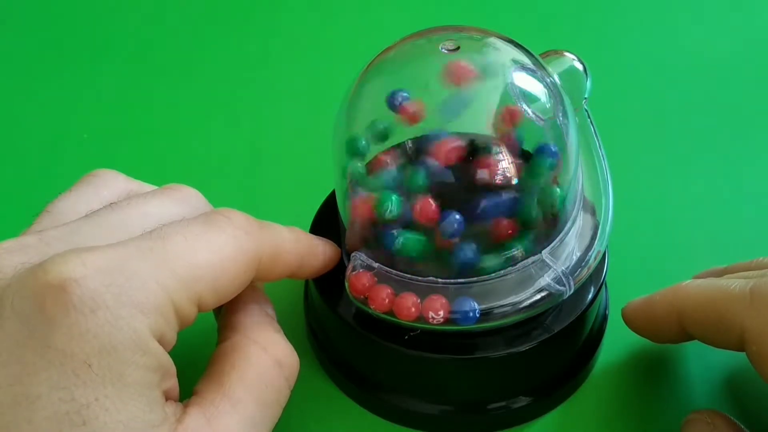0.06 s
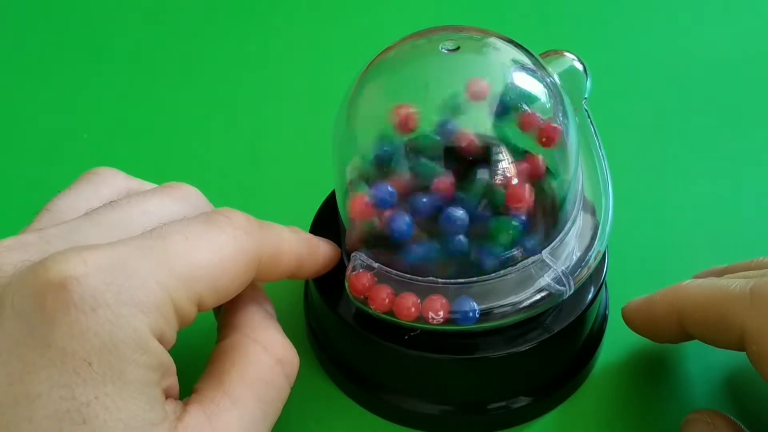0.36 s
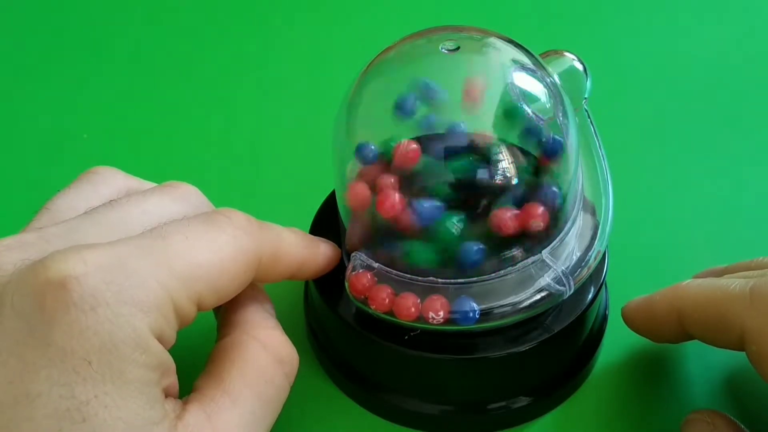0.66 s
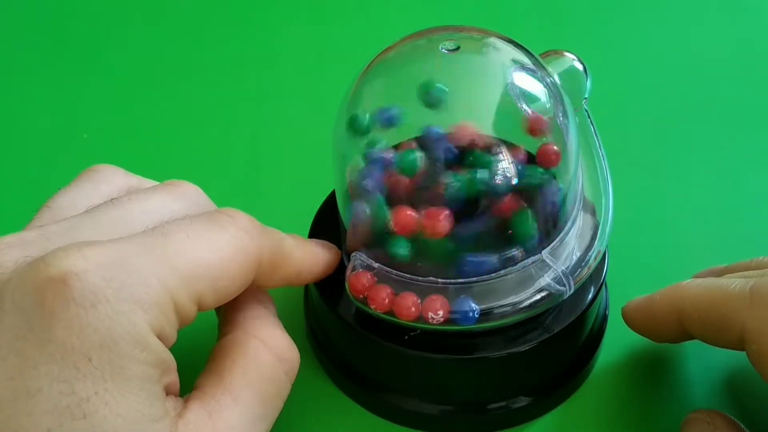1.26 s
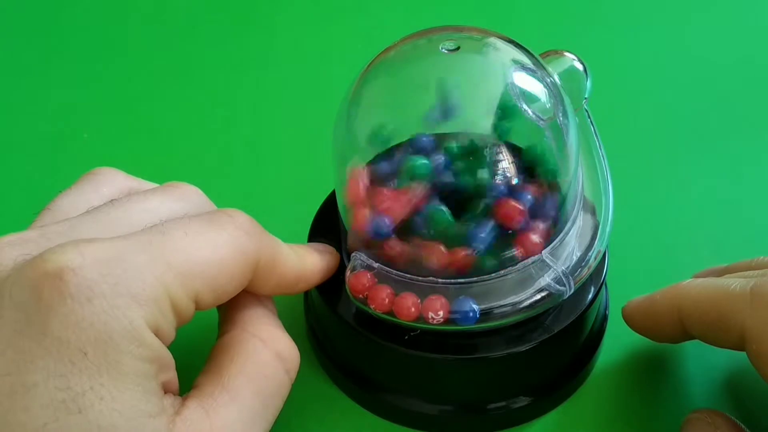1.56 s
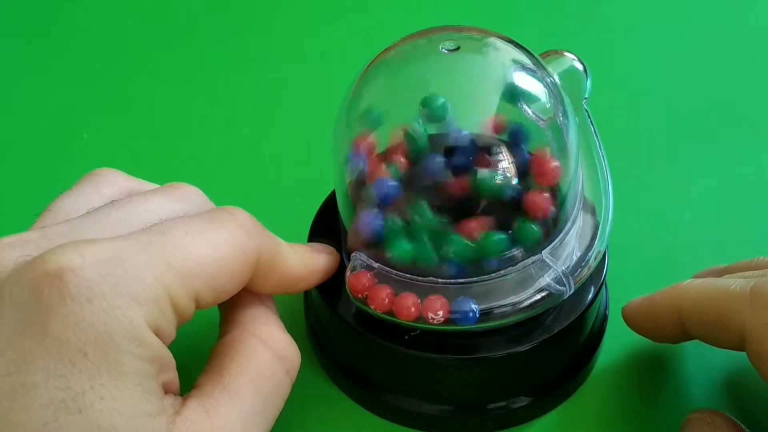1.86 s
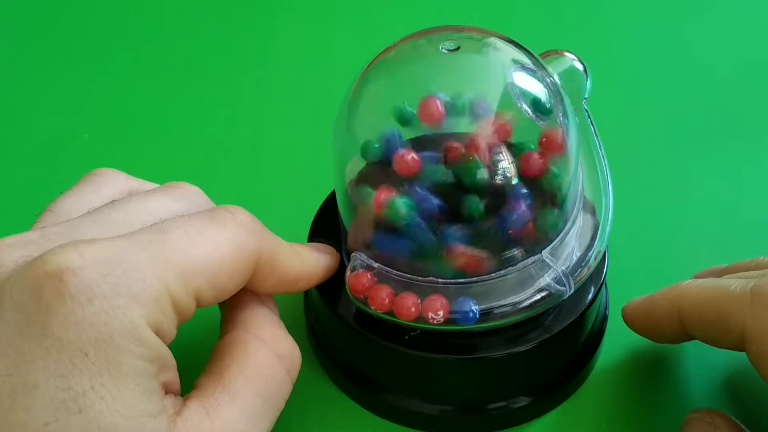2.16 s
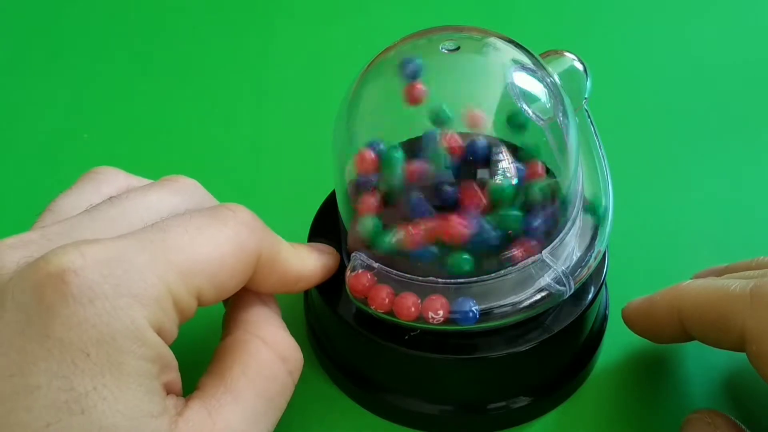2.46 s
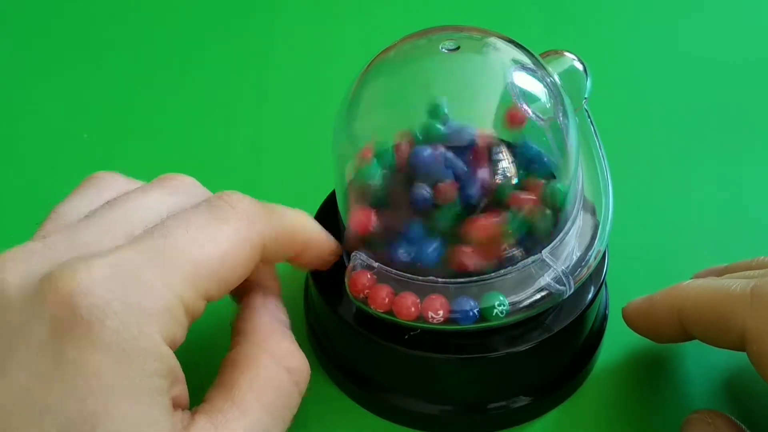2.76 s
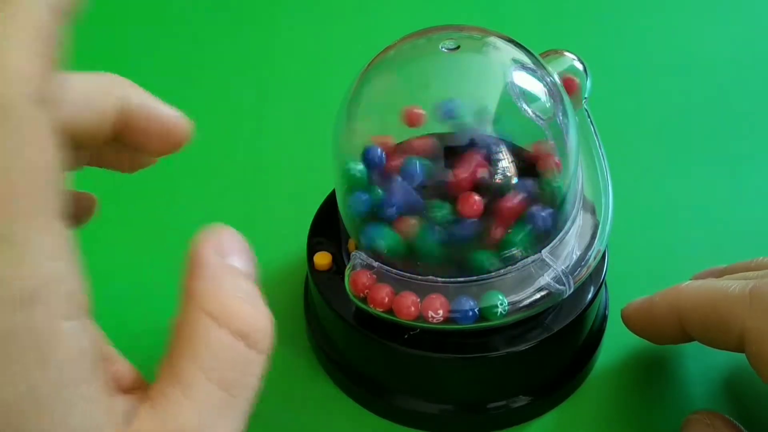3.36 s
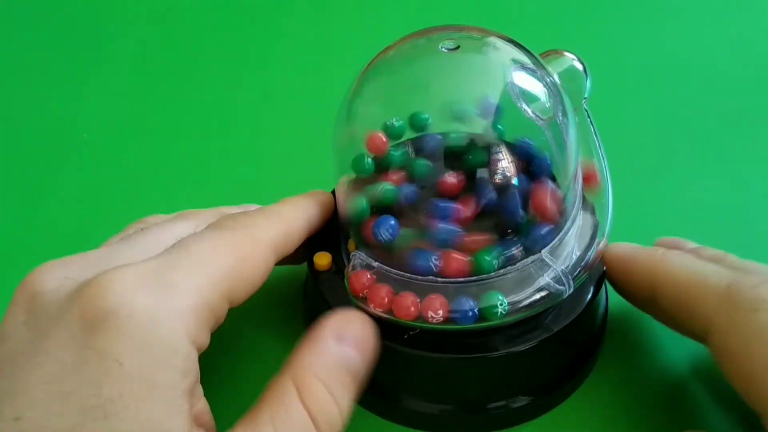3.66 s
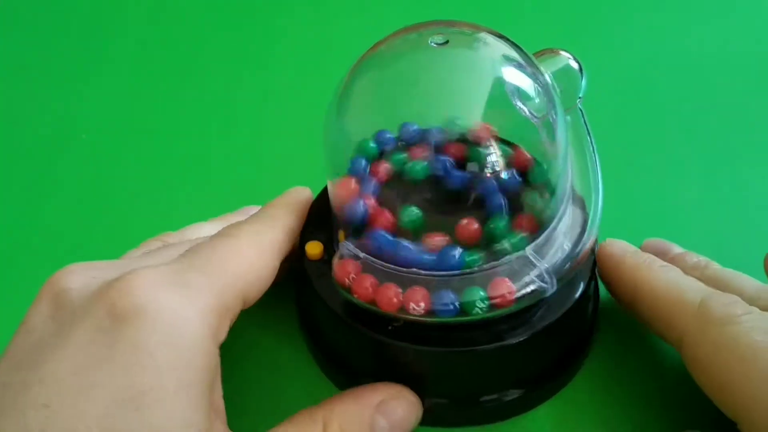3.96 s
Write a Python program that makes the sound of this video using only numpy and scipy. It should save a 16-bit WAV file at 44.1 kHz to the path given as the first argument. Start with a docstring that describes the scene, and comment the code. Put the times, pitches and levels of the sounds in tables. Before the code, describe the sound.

Small plastic balls rattle densely inside a toy lottery machine over a low motor hum.

```python
"""A small room, close to a toy lottery machine: small plastic balls churn in its clear dome.
A motor-driven plate flings them up. They click against each other and the dome in dense flurries,
ring the dome wall and drum on the plate and the hollow base. The motor hums underneath.
One brief low puff of air touches the microphone; near the end a fingertip taps the casing."""
import sys
import numpy as np
from scipy import signal
from scipy.fft import rfft, irfft, next_fast_len
from scipy.io import wavfile
from scipy.ndimage import uniform_filter1d, map_coordinates

SR = 44100
rng = np.random.default_rng(int(sys.argv[2]) if len(sys.argv) > 2 else 0)


def pcm_store(signal):
    """Save signal as 16-bit PCM."""
    levels = np.round(np.clip(np.atleast_2d(signal), -1, 1) * 32767)
    wavfile.write(sys.argv[1], SR, levels.astype(np.int16).T)


N = 176400
DOME_RISE_S = 0.00083


# Each row: time in seconds, clatter level in dB.
CLATTER_LEVELS = [(0.0, -19.5), (0.03, -17.5), (0.08, -18), (0.44, -19), (0.5, -22), (0.52, -17.5),
                  (0.95, -24), (1.01, -20), (1.02, -17), (1.05, -20), (1.3, -18), (1.31, -22), (1.36, -17),
                  (1.37, -19), (1.99, -18.5), (2.07, -18.5), (2.13, -16), (2.17, -19), (2.18, -26.5),
                  (2.19, -19), (2.29, -18.5), (3.63, -19), (3.69, -22.5), (3.71, -16), (3.77, -22),
                  (3.82, -16.5), (4.0, -22)]
# Each row: start in seconds, relative level of a hard hit in dB.
HARD_HITS = [(.1226, -3), (.2508, 0), (.3227, 1), (.609, -5.5), (.6449, -5), (.6898, 1.5), (.8041, 2),
             (.841, 0), (.9245, 1), (1.0191, -3), (1.1084, 1), (1.3008, -5.5), (1.3328, -5), (1.398, -5),
             (1.485, 0.5), (1.5405, -2), (1.8213, 1), (2.0582, -9), (2.3351, -4), (2.408, 0), (2.5203, -1),
             (2.588, -5), (2.6334, -2), (2.8499, -8), (2.8933, 3.5), (2.9584, -1.5), (3.042, -4),
             (3.2226, -1)]
# Each row: frequency in Hz, gain of a click in dB.
CLICK_SPECTRUM = [(200, -39.5), (600, -15), (1100, -20.5), (1500, -21.5), (1750, -17.5), (2000, -14.5),
                  (2300, -14.5), (2850, -9), (3450, -11), (3900, -7), (4250, -7), (4850, -3.5),
                  (5200, -5.5), (5850, -2), (6300, -4.5), (7300, -3), (8200, -2.5), (8700, -0.3),
                  (9200, -3), (10200, -4), (12000, -8), (14500, -10), (15700, -10.5)]
def clatter(flurry_db, rebound_s=0.0012, rebound_db=-1.5):
    """Balls click against each other and the dome; a few hit hard and chatter."""
    level_db, = curves(CLATTER_LEVELS)
    clicks = collisions(impacts(per_s=1100, scatter_db=1.5))
    clicks = steady(coloured(clicks, CLICK_SPECTRUM), span_s=0.02)
    hard = np.zeros((2, N + SR))
    for start_s, db in HARD_HITS:
        for k, click in enumerate(contacts(count=4)):
            at = round((start_s + k * rebound_s) * SR)
            hard[:, at:at + click.shape[1]] += amp(db + 11.5 + k * rebound_db) * click
    churn = (clicks * amp(flurry_db) + amp(-15.5) * ticks()) * amp(level_db + 1.85)
    return spread(churn + coloured(hard[:, :N], CLICK_SPECTRUM))


def collisions(blows, spots=8, block=882):
    """Each blow lands on one of a few spots, which keep changing as the heap turns."""
    out = np.zeros((2, N + SR))
    spot = rng.integers(spots, size=N)
    starts = range(0, N, block)
    for at, clicks in zip(starts, np.split(contacts(spots * len(starts)), len(starts))):
        spot_blows = blows[at:at + block] * (spot[at:at + block] == np.arange(spots)[:, None])
        part = signal.fftconvolve(spot_blows[:, None], clicks, axes=2).sum(axis=0)
        out[:, at:at + part.shape[1]] += part
    return out[:, :N]


def contacts(count, size=1024, tint_knots=24):
    """Clicks of energy 1: a crack, the dome's short ring and the ball's own ping."""
    t = np.arange(size) / SR
    crack = unit(decay(t, t60_s=0.00044))
    dome = unit((1 - np.exp(-t / DOME_RISE_S)) * decay(t, t60_s=0.008))
    clicks = rng.standard_normal((count, 2, size)) * np.hypot(crack, dome)
    ping_hz = 8150 * 2 ** (0.323 * np.clip(rng.standard_normal((count, 1, 1)), -2.5, 1.7))
    ping = np.sin(2 * np.pi * (ping_hz * t + rng.random((count, 2, 1))))
    clicks += amp(-8.5) * unit(ping * decay(t, t60_s=0.0054))
    tint_db = 2.5 * signal.resample(rng.standard_normal((count, 1, tint_knots)), size // 2 + 1, axis=2)
    clicks = irfft(rfft(np.roll(clicks, tint_knots, axis=2)) * amp(tint_db))
    return clicks / np.linalg.norm(clicks, axis=2, keepdims=True)


def ticks(size=128):
    """Ball meets ball in mid-air: a bare, very short crack, panned at random."""
    out, t = np.zeros((2, N + size)), np.arange(size) / SR
    blows = impacts(per_s=45, scatter_db=1.3)
    for at in np.flatnonzero(blows):
        crack = rng.standard_normal((2, size)) * decay(t, t60_s=0.0007)
        pan_db = rng.normal(0, 1.4) * np.array([[1], [-1]])
        out[:, at:at + size] += blows[at] * unit(crack * amp(pan_db))
    return unit(coloured(out[:, :N], CLICK_SPECTRUM))


# Each row: time in seconds, clack level in dB.
CLACK_LEVELS = [(0.0, -34), (0.19, -43), (0.24, -20), (0.27, -37), (0.29, -29.5), (0.41, -41), (0.56, -30),
                (0.59, -37), (0.68, -25.5), (0.75, -41), (0.77, -28.5), (0.98, -32), (2.36, -30.5),
                (2.37, -24), (2.42, -38), (2.45, -27), (2.54, -39.5), (2.81, -28.5), (2.84, -55),
                (2.85, -27), (2.92, -32.5), (3.88, -28.5), (3.94, -24.5), (4.0, -29.5)]
# Each row: dome wall resonance in Hz, width in Hz, gain in dB.
WALL_MODES = [(1996, 120, -4), (2297, 110, -9.5), (2770, 177, -1.5), (2965, 65, -2), (3163, 106, -1),
              (3713, 50, 5), (3846, 95, 1)]
def clacks(flurry_db):
    """Balls thrown against the dome wall ring it briefly, duller than the clicks."""
    level_db, = curves(CLACK_LEVELS)
    blows = np.array([impacts(per_s=260, scatter_db=0.5) for _ in range(2)])
    wall = resonate(spread(blows * amp(flurry_db)), WALL_MODES)
    return steady(wall, span_s=0.12) * amp(level_db)


# Each row: start in seconds, relative level in dB, pitch in Hz.
GLANCES = [(0.5192, -17, 3300), (0.7607, -19.5, 2860), (0.8824, -15, 3070), (1.1423, -19, 3730),
           (1.7724, -20, 2750), (2.8449, -20, 3210), (2.9672, -22, 3080), (3.1567, -25, 2780)]
def glancing_blows(size=4096):
    """Each glancing blow rings one pitch of the dome wall."""
    out, t = np.zeros(N + size), np.arange(size) / SR
    envelope = (1 - np.exp(-t / DOME_RISE_S)) * decay(t, t60_s=0.034)
    for start_s, db, hz in GLANCES:
        out[round(start_s * SR):][:size] += amp(db - 2) * envelope * np.sin(2 * np.pi * hz * t)
    return out[:N]


# Each row: time in seconds, base level in dB, plate level in dB.
DRUM_LEVELS = [(0.0, -33, -49), (0.03, -32.5, -31.5), (0.05, -34.5, -38.5), (0.21, -36, -38),
               (0.22, -32.5, -34.5), (0.39, -35, -37.5), (0.43, -35, -50), (0.47, -28, -35),
               (0.5, -41, -49), (0.52, -30.5, -29), (0.58, -39, -47), (0.59, -36, -36.5),
               (0.68, -33.5, -35.5), (0.73, -35, -41), (0.76, -33, -35.5), (0.93, -37, -41.5),
               (0.96, -29, -28.5), (1.0, -35, -36), (1.29, -30.5, -34.5), (1.31, -35, -42),
               (1.37, -31, -33), (1.5, -38, -37), (1.59, -29, -29), (1.61, -32.5, -34), (1.74, -30.5, -33),
               (1.9, -33.5, -38.5), (2.12, -32, -32), (2.16, -31.5, -41), (2.18, -40, -53),
               (2.21, -32, -31), (2.25, -41, -49), (2.28, -28, -26), (2.32, -39.5, -43), (2.37, -29, -32),
               (2.58, -36.5, -40), (2.63, -29.5, -34), (2.7, -37.5, -39), (2.8, -32.5, -34),
               (2.83, -40, -44), (2.9, -31, -29.5), (2.92, -45, -48), (2.97, -45, -38), (3.03, -33, -40),
               (3.06, -41.5, -51), (3.12, -36, -33.5), (3.15, -52, -60), (3.22, -32.5, -34),
               (3.33, -53, -56), (3.36, -36.5, -36.5), (3.42, -50, -62), (3.45, -35.5, -34),
               (3.52, -52, -50), (3.55, -44, -36), (3.57, -37.5, -49), (3.6, -32, -31), (3.64, -48, -59),
               (3.66, -40, -33.5), (3.74, -45, -50), (3.8, -32, -30.5), (3.83, -49, -45),
               (3.84, -39.5, -38.5), (4.0, -44, -46)]
# Each row: time in seconds, relative level of the housing's rumble in dB.
RUMBLE_LEVELS = [(0.0, -39), (0.2, -46), (0.23, -36), (0.41, -44), (0.5, -41.5), (1.18, -40.5), (1.25, -38),
                 (1.48, -42), (1.58, -32), (1.63, -41), (1.72, -37.5), (2.45, -39), (2.96, -49.5),
                 (4.0, -52)]
# Each row: resonance in Hz, width in Hz, gain in dB.
BASE_MODES = [(119, 75, -13), (191.4, 29, -7.5), (281.3, 20.8, 3.5), (360, 48, -5.5), (443.5, 39, -5)]
PLATE_MODES = [(850.6, 80.5, -0.5), (935.5, 60, -1.5), (1027, 32, -4), (1222, 184, -14.5)]
# Each row: frequency in Hz, gain through the housing in dB.
HOUSING_SPECTRUM = [(60, -11.5), (95, -1.5), (118, 1.5), (140, -3.5), (160, -1.5), (195, 6), (225, -0.5),
                    (270, -18.5), (900, -62)]
def drumming(flurry_db, low_cut_hz=46):
    """Balls land on the spinning plate, which rings and shakes the hollow base and the housing."""
    base_db, plate_db = curves(DRUM_LEVELS)
    rumble_db, = curves(RUMBLE_LEVELS)
    knocks = np.array([impacts(per_s=380, scatter_db=3.5) for _ in range(2)])
    knocks = spread(knocks * amp(0.99 * flurry_db))
    # The small base radiates little deep bass.
    knocks = filtered(knocks, lambda hz: hz ** 2 / (hz ** 2 + low_cut_hz ** 2))
    base = coloured(resonate(knocks, BASE_MODES), [(40, -6), (110, 1.5), (470, 6), (560, -7), (1500, -13)])
    base = steady(base, span_s=0.058)
    plate = steady(resonate(knocks, PLATE_MODES), span_s=0.094)
    housing = steady(coloured(knocks, HOUSING_SPECTRUM), span_s=0.12)
    return base * amp(base_db - 1) + plate * amp(plate_db) + housing * amp(rumble_db - 5)


# Each row: start in seconds, peak in dB.
BASE_THUMPS = [(0.016, -22), (.228, -20), (1.565, -32), (2.071, -21), (2.27, -27), (2.609, -23.5)]
def thumps():
    """The plate catches a ball squarely and the base booms."""
    return struck(BASE_MODES, BASE_THUMPS)


# Each row: casing resonance in Hz, width in Hz, gain in dB.
CASING_MODES = [(1210, 150, 1), (1390, 160, 2), (520, 90, -6)]
def finger_tap(start_s=3.878, peak_db=-24):
    """A fingertip lands on the casing and rings it."""
    return struck(CASING_MODES, [(start_s, peak_db)])


# Each row: frequency in Hz, nominal rms level in dB.
MOTOR_LINES = [(118, -49.5), (281, -49.5), (851, -53.5), (1200, -57)]
def motor():
    """The hum wavers in speed and strength; the load of the balls follows the rumble level."""
    warped_s = np.cumsum(1 + 0.00753 * wobble(7)) / SR
    rumble_db, = curves(RUMBLE_LEVELS)
    load_db = 0.77 * (rumble_db - rumble_db.mean())
    hum = np.zeros(N)
    for hz, db in MOTOR_LINES:
        waver_db = 2.8 * wobble(7.68) + 1.5 * wobble(35)
        hum += amp(db + load_db + waver_db) * np.sqrt(2) * np.sin(2 * np.pi * hz * warped_s)
    return hum


# Each row: frequency in Hz, gain in dB.
PUFF_SPECTRUM = [(5, -20), (15, -3), (27, 0), (45, -14), (70, -28), (150, -98)]
def puff(centre_s=1.2, width_s=0.035):
    """One low puff of air at the microphone."""
    swell = np.exp(-((np.arange(N) / SR - centre_s) / width_s) ** 2 / 2)
    noise = filtered(rng.standard_normal((2, N)), lambda hz: amp(along(PUFF_SPECTRUM, hz)))
    return steady(noise, span_s=0.08) * swell * amp(-37)


def reflections(x, blocks=12, size=8192):
    """A short room response that changes as the balls move about."""
    x = coloured(x, [(200, -21), (900, -5), (2000, 3), (15000, 8.5)])
    out = np.zeros((2, N + SR))
    for block in np.array_split(np.arange(N), blocks):
        tail = rng.standard_normal((2, size)) * decay(np.arange(size) / SR, t60_s=0.11)
        tail /= np.linalg.norm(tail, axis=1, keepdims=True)
        wet = signal.fftconvolve(x[:, block], tail, axes=1)
        out[:, block[0]:][:, :wet.shape[1]] += wet
    return out[:, :N]


# Each row: frequency in Hz, gain in dB.
ROOM_SPECTRUM = [(15, 7), (60, 7.5), (100, 3), (300, 11.5), (2000, -51), (15000, -19)]
def room_noise():
    """Quiet, steady, low background noise."""
    return amp(-50) * unit(spread(coloured(rng.standard_normal((2, N)), ROOM_SPECTRUM)))


# Each row: frequency in Hz, left-right correlation before clipping to +-0.99.
CORRELATION = [(40, 0.43), (100, 1), (300, 1), (420, 0.93), (530, 0.34), (860, 0.99), (1100, 0.021),
               (1450, 0.63), (1650, 0.099), (2000, 0.75), (2350, 0.35), (2700, 1), (3050, 0.12),
               (3350, 0.25), (3800, -0.66), (4150, -1.45), (4600, 0.83), (5000, -0.045), (6200, 0.18),
               (7300, -0.14), (8500, 0.17), (9500, -0.079), (15000, 0.14)]
def spread(pair):
    """Mixes two unrelated signals to stereo; near 4 kHz the dome rocks sideways, in antiphase."""
    def mid_side_gains(hz):
        angle = np.arccos(np.clip(along(CORRELATION, hz), -0.99, 0.99)) / 2
        return np.array([np.cos(angle), np.sin(angle)])
    mid, side = filtered(pair, mid_side_gains)
    return np.array([mid + side, mid - side])


# Each row: frequency in Hz, left minus right in dB.
DOME_BALANCE = [(300, -.3), (650, -1.5), (880, -.3), (1100, -2), (2000, 1), (2900, -3), (3900, -.3),
                (4900, -2), (6500, -1), (8000, -1), (8700, 1.3), (9500, .8), (15000, 2.2)]
def lean(x):
    """The dome throws some pitches to one side."""
    return filtered(x, lambda hz: amp(np.outer([0.5, -0.5], along(DOME_BALANCE, hz))))


def impacts(per_s, scatter_db):
    """Random blows of scattered strength and either sign."""
    lands = rng.random(N) < per_s / SR
    strength = amp(scatter_db * np.clip(rng.standard_normal(N), -3, 1.7))
    return lands * strength * rng.choice([-1, 1], N)


def struck(modes, blows):
    """Rings the modes once for each (s, peak dB) blow."""
    boom = resonate(signal.unit_impulse(N), modes)[:SR // 5]
    out = np.zeros(N + SR)
    for start_s, db in blows:
        out[round(start_s * SR):][:len(boom)] += amp(db) * boom / np.abs(boom).max()
    return out[:N]


def resonate(x, modes):
    """Parallel (Hz, width Hz, dB) resonances of alternating sign."""
    return filtered(x, lambda f: sum((-1) ** k * amp(db) * 1j * f * width / (hz**2 - f**2 + 1j * f * width)
                                     for k, (hz, width, db) in enumerate(modes)))


def steady(x, span_s):
    """Holds the mean power over span_s near 1."""
    power = np.abs(uniform_filter1d(np.mean(x ** 2, axis=0), int(span_s * SR)))
    return unit(x / np.sqrt(uniform_filter1d(power, int(span_s * SR / 2)) + power.mean() / 20))


def coloured(x, points, size=4096):
    """Minimum-phase filter with the gain of the (Hz, dB) points."""
    cepstrum = irfft(np.log(amp(along(points, np.fft.rfftfreq(size, 1 / SR)))))
    cepstrum[1:size // 2] *= 2
    cepstrum[size // 2 + 1:] = 0
    return signal.fftconvolve(x, irfft(np.exp(rfft(cepstrum)))[None], axes=1)[:, :N]


def filtered(x, response):
    """Applies a complex response, given as a function of Hz."""
    size = next_fast_len(N + SR // 2, True)
    return irfft(rfft(x, size) * response(np.fft.rfftfreq(size, 1 / SR)), size)[..., :N]


def wobble(knots_per_s):
    """A smooth random curve."""
    return map_coordinates(rng.standard_normal(4096), [np.arange(N) * knots_per_s / SR], mode="wrap")


def curves(rows):
    """One value per sample for each column after the time."""
    times_s, *columns = np.transpose(rows)
    return [np.interp(np.arange(N) / SR, times_s, column) for column in columns]


def along(points, hz):
    """Interpolates (Hz, value) points on a log axis."""
    knots_hz, values = np.transpose(points)
    return np.interp(np.log(hz + 1), np.log(knots_hz + 1), values)


def decay(t, t60_s):
    """Falls 60 dB in t60_s."""
    return amp(-60 * t / t60_s)


def unit(x):
    """Scales to rms 1."""
    return x / np.sqrt(np.mean(x ** 2) + 1e-20)


def amp(db):
    """Decibels to gain."""
    return 10 ** (np.asarray(db) / 20)


def scene():
    """The machine in a small room; the balls collide in flurries a few milliseconds long."""
    flurry_db = unit(wobble(85) + 0.45 * wobble(190) + 0.5 * wobble(600))
    balls = clatter(flurry_db) + clacks(flurry_db) + glancing_blows() + drumming(flurry_db) + thumps()
    direct = balls + finger_tap()
    return lean(direct + amp(-10.5) * reflections(direct)) + motor() + puff() + room_noise()


def record(dry, top_hz=15750):
    """Rounds off the highest peaks and cuts everything above top_hz."""
    return filtered(dry / (1 + dry ** 8) ** (1 / 8), lambda hz: hz < top_hz)


dry = scene()
out = record(dry)
pcm_store(out)
```